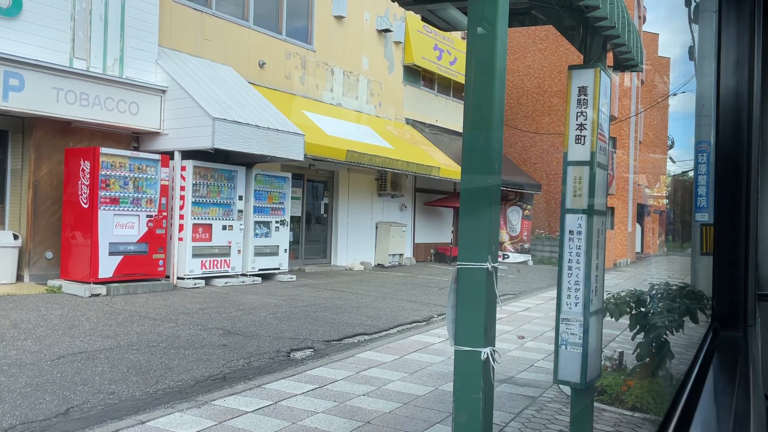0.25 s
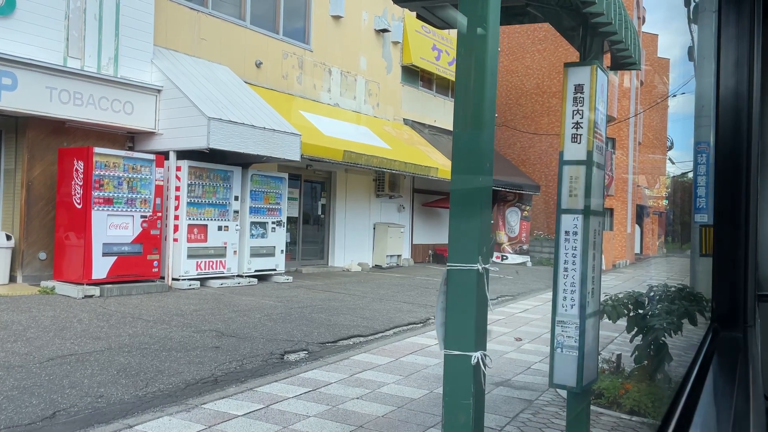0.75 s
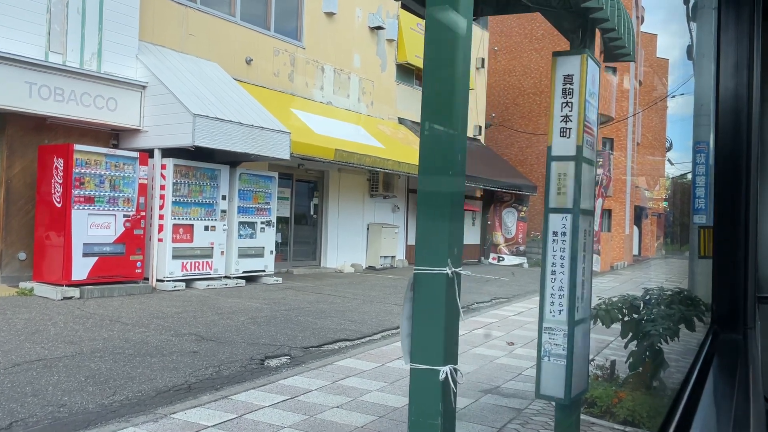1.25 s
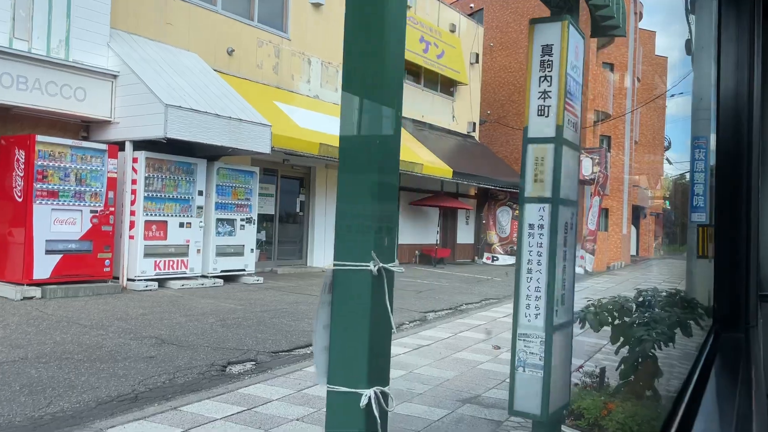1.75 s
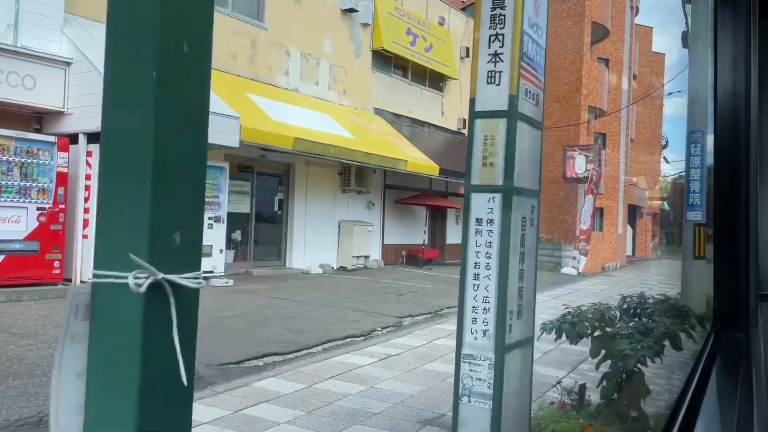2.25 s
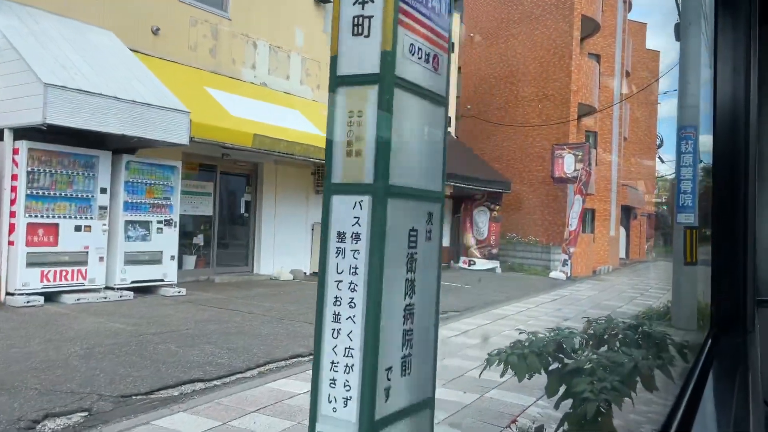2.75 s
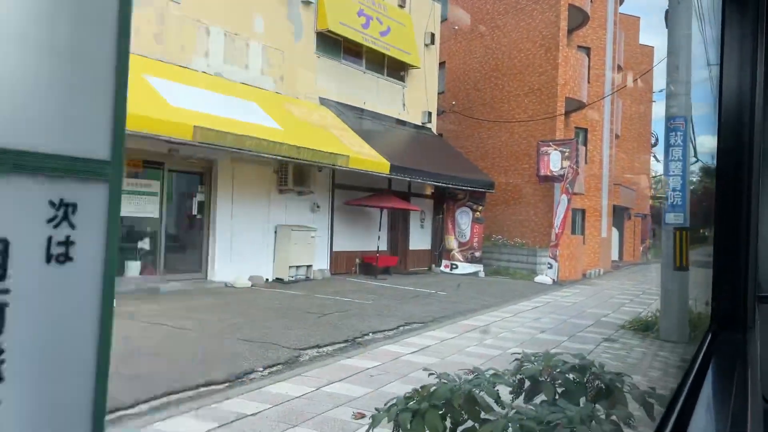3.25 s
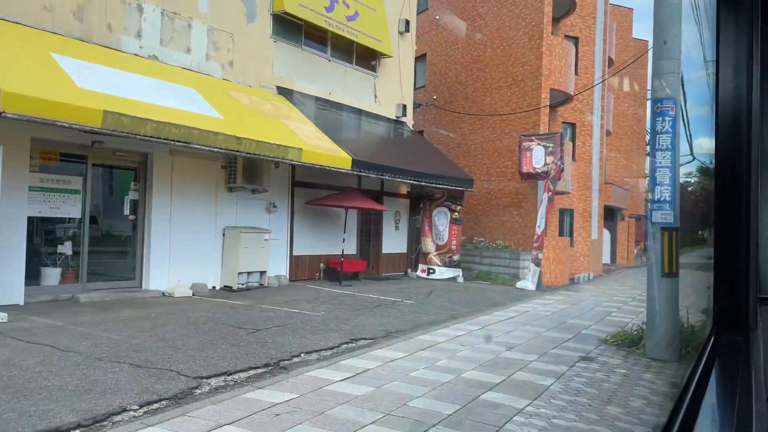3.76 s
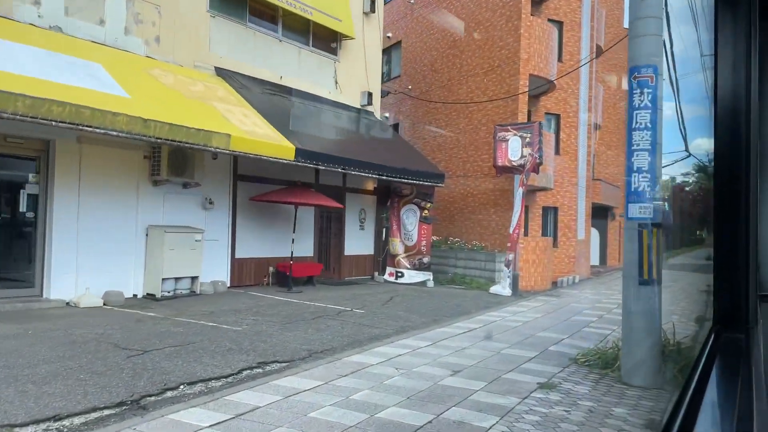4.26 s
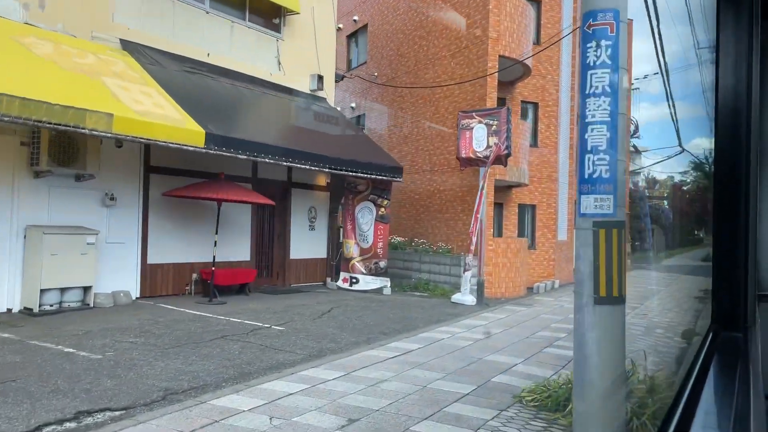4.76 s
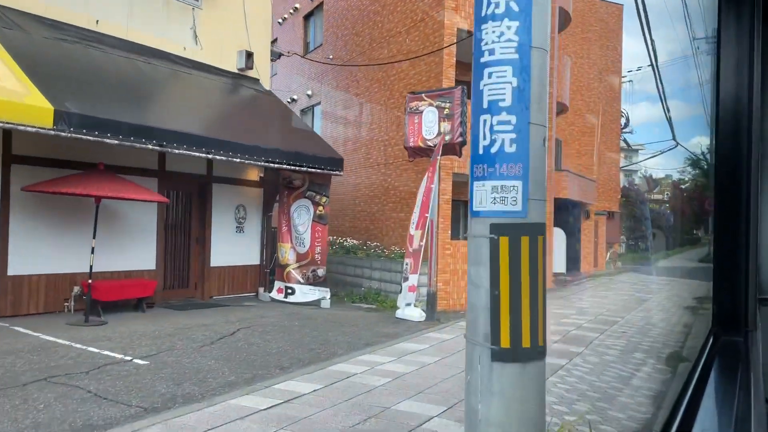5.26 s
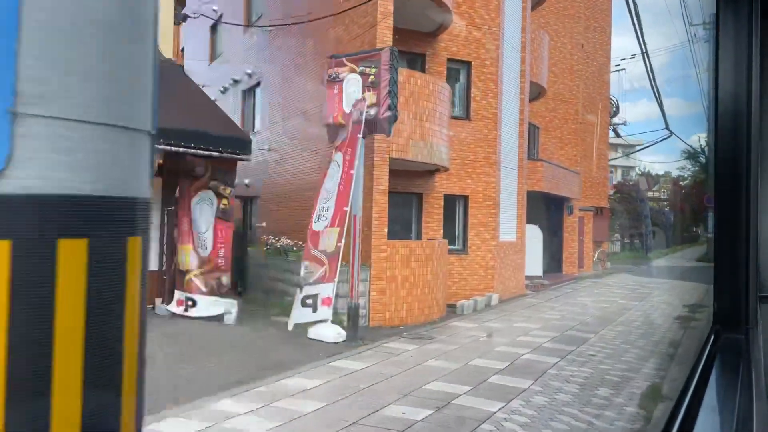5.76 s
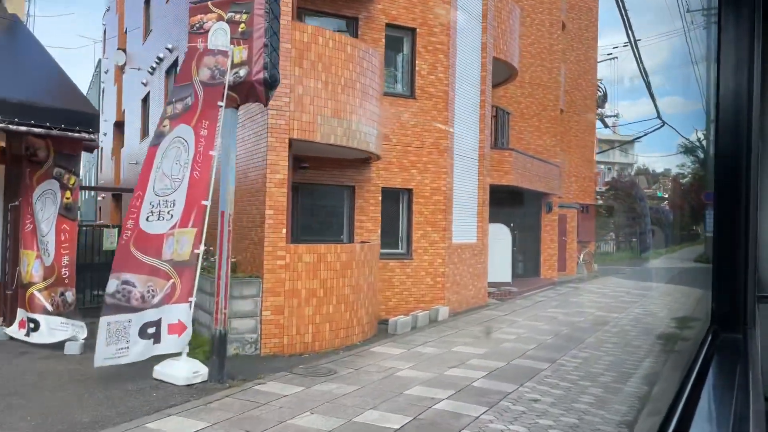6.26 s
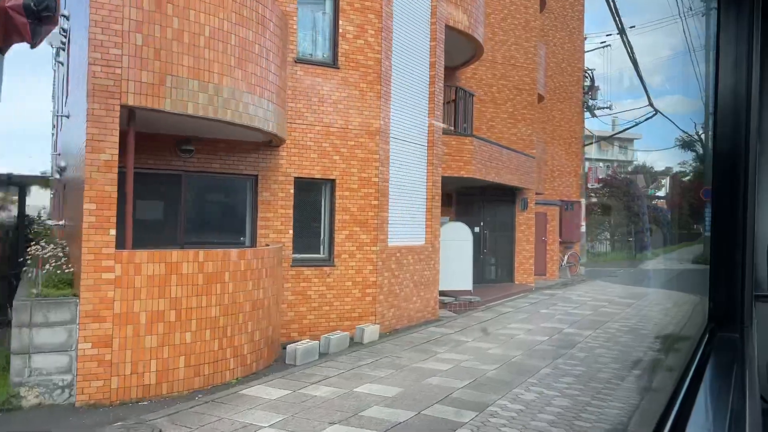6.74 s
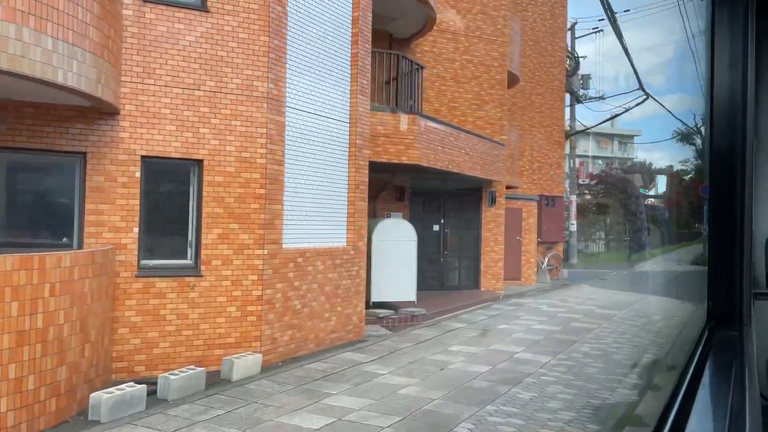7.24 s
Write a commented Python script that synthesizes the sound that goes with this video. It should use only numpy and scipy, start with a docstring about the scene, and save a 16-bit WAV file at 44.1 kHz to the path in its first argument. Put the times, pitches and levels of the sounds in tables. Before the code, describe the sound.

Inside a bus pulling away, the diesel engine sags to a low throb, revs up to a loud drone, then falls at the gear shift.

```python
"""A six-cylinder bus diesel, heard from inside: it sags as the clutch bites, revs up in first gear, drops at the shift.
Sines locked to the engine cycle make its tones; shaped noise makes its boom, roar and knock.
Gears whine and a panel drones as gliding sines; trim ticks and air valves puff as noise through resonances.
Behind them are a squeal, a squeak, a faint steady tone, ventilation noise and a fan motor tone.
A two-port microphone hears it all, bass nearly alike in both ports, treble with gaps in its spectrum."""
import sys
import numpy as np
from scipy import signal
from scipy.fft import rfft, irfft
from scipy.io import wavfile
from scipy.ndimage import uniform_filter1d

SR = 44100
rng = np.random.default_rng(int(sys.argv[2]) if len(sys.argv) > 2 else 0)


def master(y):
    """Save y as 16-bit WAV."""
    cut = np.clip(np.atleast_2d(y).T, -1, 1)
    pcm = np.round(cut * 32767)  # scale
    wavfile.write(sys.argv[1], SR, pcm.astype(np.int16))


N = 330750
T, HZ = np.arange(N) / SR, np.fft.rfftfreq(N, 1 / SR)  # time of each sample (s), frequency of each bin (Hz)
CYLINDERS = 6  # firings in one four-stroke cycle
MID_HZ, MID_LOAD_DB = 70, -25  # firing rate and load that the engine levels refer to

# Course of the engine, levels before the cabin: start_s, firing_hz, load_db (sets roar, knock and uneven tones),
# boom_db, firing_tone_db, one_and_a_half_times_db, twice_db
ENGINE = [(0.0, 47.48, -35.5, -27.5, -33.5, -49.5, -37.5), (0.5, 35.75, -42, -30, -33.5, -32.5, -26.5),
          (0.898, 26.92, -39.5, -28.5, -43, -49, -42.5), (1.202, 20.94, -41, -25, -53, -58, -43),
          (1.498, 23.62, -37.5, -25.5, -44, -49, -37), (1.8, 28.7, -34.5, -25, -40, -30.5, -26),
          (2.1, 35.02, -33, -20.5, -25, -32, -30.5), (2.401, 40.9, -30.5, -25, -32, -39, -36.5),
          (2.649, 45.76, -29.5, -26, -39, -34.5, -26.5), (2.899, 50.12, -28.5, -24, -22.5, -31, -31),
          (3.1, 54.53, -28, -24.5, -19.5, -32.5, -22), (3.301, 59.43, -26.5, -23.5, -23, -24, -32.5),
          (3.5, 62.9, -29.5, -30.5, -33, -29.5, -31), (3.7, 68.5, -28, -24.5, -18, -23, -27.5),
          (3.9, 73.04, -24.5, -29, -34, -27.5, -24.5), (4.102, 76.87, -25.5, -26.5, -18, -18, -27.5),
          (4.301, 80.88, -23, -29.5, -13.5, -23.5, -25.5), (4.502, 85.34, -20.5, -24.5, -28.5, -16, -37.5),
          (4.702, 89.7, -19.5, -20.5, -21.5, -28.5, -36), (4.901, 94.2, -18.5, -24.5, -21, -22, -26.5),
          (5.098, 96.9, -20, -25.5, -19.5, -18.5, -26.5), (5.299, 101.4, -17, -28.5, -19.5, -22.5, -26),
          (5.548, 105.1, -19.5, -22.5, -32.5, -22.5, -25.5),
          (5.699, 104.5, -19.5, -26.5, -26, -20.5, -22.5), (5.9, 100.8, -21.5, -25, -37, -25.5, -24.5),
          (6.103, 98.1, -22.5, -23, -27.5, -18.5, -32), (6.353, 93.55, -24, -23.5, -40, -31, -37.5),
          (6.601, 89.16, -24.5, -29, -30.5, -22, -29.5), (6.8, 83.85, -26.5, -25, -42, -23, -32.5),
          (6.948, 81, -27, -30, -24.5, -21, -30.5), (7.099, 71.47, -26, -28, -25, -24.5, -29.5),
          (7.253, 63.3, -27.5, -27.5, -23.5, -23.5, -32), (7.5, 59.2, -26, -21.5, -29, -31.5, -37)]
# Multiples of the cycle whose levels stand in ENGINE: firing tone, 1.5 times it, twice it
MAIN_TONES = (6, 9, 12)


def engine():
    """Periodic combustion: harmonics of the cycle plus noise whose level follows the load."""
    firing_hz, load_db, boom_db, *main_db = curves(ENGINE)
    cycle = 2 * np.pi * np.cumsum(firing_hz) / SR / CYLINDERS
    load_change_db = load_db - MID_LOAD_DB
    tones = harmonics(cycle, MAIN_TONES, main_db) + steady_tones(cycle, firing_hz)
    tones = tones + uneven_tones(cycle, load_change_db)
    return tones + rumble(boom_db, load_db) + combustion_knock(cycle, load_change_db)


# Steady tones, multiple of the cycle: (level_db at MID_HZ, rise_db per octave of revs, lift_db off the throttle)
ORDERS_OF_CYCLE = {2: (-37.5, 18, -2), 3: (-32.5, 22, 0.5), 4: (-36.5, 20, 0.5), 5: (-26.5, 12, -1.5),
                   7: (-30.5, 2.6, 0.42), 10: (-35.5, 16, 0.56), 11: (-27.5, 5.9, 0.5), 14: (-31.5, 4, 4.4),
                   15: (-28, 1.6, -3), 18: (-34.5, 3.9, 1), 28: (-35.5, 3.7, -1), 30: (-39.5, 7.1, -9.5)}


def steady_tones(cycle, firing_hz):
    """Forced vibration: each order grows with the revs and swells as it sweeps through a frame resonance."""
    lift_s, pedal_s = 5.4, 0.08  # the throttle eases off before the shift; time the move takes
    waver_db, waver_hz = 1, 5.4
    step = 128  # samples between level updates
    t, revs_hz = T[::step], firing_hz[::step]
    lifted = np.clip((t - lift_s) / pedal_s, 0, 1)
    octaves = np.log2(revs_hz / MID_HZ)
    levels_db = []
    for k, (db, rise_db, lift_db) in ORDERS_OF_CYCLE.items():
        level_db = db + rise_db * octaves + lift_db * lifted + frame_db(k * revs_hz / CYLINDERS)
        levels_db.append(np.interp(T, t, level_db))
    waver = waver_db * np.array(wander(waver_hz, count=len(levels_db)))
    return harmonics(cycle, ORDERS_OF_CYCLE, levels_db + waver)


# Resonances of the frame that carries the steady tones: centre_hz, width_hz, gain_db
FRAME = [(34, 7.3, -16), (54.4, 6, -3), (67.4, 3.6, -1), (78.9, 6.6, -1.5), (97, 6.8, -1.5), (118.4, 15, 1),
         (149, 6.5, -0.5), (176.7, 28, -6.5), (212.3, 7.1, 0), (267.5, 40, -4), (311, 15, 1.5),
         (495.6, 27, -0.5)]


def frame_db(hz):
    """Resonant transmission: the powers of the frame's resonances add above a floor."""
    floor_db = -9
    power = amp(2 * floor_db)
    for centre_hz, width_hz, db in FRAME:
        power = power + amp(2 * db) / (1 + (2 * (hz - centre_hz) / width_hz) ** 2) ** 2
    return 10 * np.log10(power)


# Tones between the main and steady ones: multiple of the cycle, level_db within the group
UNEVEN = [(8, -4), (13, -6), (20, -10.5), (21, -11.5), (22, -7.5), (23, -6.5), (24, -6), (25, -8.5),
          (26, -9)]


def uneven_tones(cycle, load_change_db):
    """Broken symmetry: unequal cylinders fill in other multiples of the cycle."""
    level_db, load_share = -31.5, 0.75  # rms at middle load; share of each load change followed
    multiples, order_db = np.transpose(UNEVEN)
    wander_db = 3.0 * np.array(wander(2.6, count=len(UNEVEN)))
    tones = harmonics(cycle, multiples, order_db[:, None] + wander_db)
    return evened(tones) * amp(level_db + load_share * load_change_db)


# Spectrum of the body boom: hz, level_db per Hz (relative)
BOOM = [(8, -13), (18, -14.5), (30, -5.5), (49, -0.5), (75, 8.5), (118, 0.5), (167, -2.5), (260, -6.5),
        (340, -59.5)]
# Spectrum of the low roar: hz, level_db per Hz (relative)
ROAR = [(35, -22), (60, -9.5), (179, -0.5), (295, -7.5), (379, -2), (545, -17), (618, -14.5), (877, -31.5),
        (1200, -24.5), (1560, -78), (2640, -120)]


def rumble(boom_db, load_db):
    """Broadband radiation: boom and roar surge and dip at random."""
    roar_top_db = -25.5  # the roar's load level is capped; at high revs the tones take over
    lumpy_db, lumpy_hz = 2.5, 8
    boom_lumps, roar_lumps = lumpy_db * np.array(wander(lumpy_hz, count=2))
    boom = coloured(noise(), BOOM) * amp(boom_db + boom_lumps)
    roar = coloured(noise(), ROAR) * amp(np.minimum(load_db, roar_top_db) + roar_lumps)
    return boom + roar


# Spectrum of the combustion knock: hz, level_db per Hz (relative)
KNOCK = [(410, -15.5), (540, 2), (650, 0), (757, 0.5), (898, -1.5), (1140, -10), (1500, -10), (1910, -21),
         (2430, -26.5), (4500, -33.5), (5850, -65.5), (9900, -120)]


def combustion_knock(cycle, load_change_db):
    """Amplitude modulation: combustion noise throbs with each firing."""
    level_db, load_share = -41.5, 0.83  # rms at middle load; share of each load change followed
    throb = 1 + 0.18 * np.cos(CYLINDERS * cycle)
    return coloured(noise() * throb, KNOCK) * amp(level_db + load_share * load_change_db)


# First gear whines as it takes up speed: start_s, pitch_hz, level_db
FIRST_GEAR = [(2.25, 184, -48), (2.65, 208, -28), (2.95, 230, -33.5), (3.1, 251, -37.5), (3.3, 272, -29.5),
              (3.55, 290, -31), (3.7, 308, -32.5)]
# Second gear takes up drive: start_s, pitch_hz, level_db
SECOND_GEAR = [(6.72, 338, -37.5), (6.88, 335, -31.5), (7.02, 333.4, -28.5), (7.25, 342, -27),
               (7.5, 352, -24.5)]


def gear_whine():
    """Gear meshing: a sine whose pitch glides with the speed."""
    return tone(FIRST_GEAR) + tone(SECOND_GEAR)


# A panel drones at high revs: start_s, pitch_hz, level_db
DRONE = [(4.78, 563, -43), (5.12, 569, -36.5), (5.3, 568, -40), (5.72, 568, -35), (5.84, 570, -46)]


def panel_drone():
    """Panel resonance: a nearly fixed sine whose level wavers."""
    waver_db = 1.8 * wander(6, count=1)[0]
    return tone(DRONE) * amp(waver_db)


# Trim ticks, levels before the trim resonances: start_s, knock_db (peak), knock_hz, t60_s (the knock takes half),
# rattle_db, treble_db
TICKS = [(1.285, -37, 3323, 0.028, -47, -49), (1.865, -56, 3060, 0.033, -46, -45),
         (2.012, -40, 3260, .015, -54, -70), (2.377, -62, 3216, 0.015, -50, -51),
         (2.411, -49.5, 3225, 0.038, -46, -52), (2.5276, -46, 3300, 0.031, -30.5, -34),
         (2.871, -41.5, 3570, 0.02, -50.5, -73), (3.262, -42, 3199, 0.026, -55, -55),
         (3.827, -33.5, 3322, 0.013, -39.5, -70), (4.7515, -46, 4296, 0.061, -35.5, -50),
         (4.776, -39, 2509, .03, -49.5, -69), (6.089, -35, 3360, 0.017, -44.5, -39)]
# Resonances of the loose trim: centre_hz, width_hz, gain_db
TRIM = [(1100, 770, 10.5), (2460, 400, -6), (3280, 900, 1.5), (4520, 1600, -9), (5900, 700, -5.5)]


def ticks():
    """Impact excitation: a compact decaying knock, then a short crackle in the loose trim."""
    rattle_rise_s, rattle_top_hz = 0.0042, 6500
    knock, rattle, treble = np.zeros((3, N))
    for s, knock_db, hz, t60, rattle_db, treble_db in TICKS:
        after = np.clip(T - s, 0, 1)
        fall = amp(-60 * after / t60) * (T >= s)
        attack = np.minimum(after / 0.00023, 1)
        knock = knock + amp(knock_db) * fall ** 2 * np.sin(2 * np.pi * hz * after) * attack
        # the gain makes up for the fall during the rise
        crackle = fall * np.minimum(after / rattle_rise_s, 1) ** 2 * amp(60 * rattle_rise_s / max(t60, .02))
        rattle = rattle + amp(rattle_db) * crackle
        treble = treble + amp(treble_db) * crackle
    grains = evened(noise() * noise())  # a product of noises is spikier than one noise
    dull = signal.butter(4, rattle_top_hz, fs=SR, output="sos")
    trim = signal.sosfilt(dull, modes(rattle * grains, TRIM))
    return knock + trim + modes(treble * noise(), [(11100, 7200, 0.0032)])


# Air valve puffs: start_s, level_db (before sputter and nozzle gains), rise_s, t60_s,
# treble_db against mids, whistle_db against mids
PUFFS = [(.12, -84, 0.026, .45, 6, -15), (2.40, -82, .015, 0.28, 8, -15),
         (2.535, -76, 0.0032, 0.12, 4, -23), (2.9, -75, 0.0073, 0.086, -4, -14),
         (3.254, -76, 0.01, 0.24, 2, -9), (4.319, -77, 0.016, 0.33, -3, -11),
         (4.455, -73, 0.017, 0.43, -7, -8), (4.73, -70, 0.026, 0.32, -11, -23),
         (4.9, -80, .015, 0.2, 2.5, -19), (5.66, -76, 0.022, 0.43, 4, -8),
         (5.695, -69, 0.019, 0.25, -7, 7.5), (5.885, -75.5, 0.01, 0.28, -3, -3),
         (6.36, -71.5, 0.02, 0.29, 8, 0)]
# Nozzle resonances, a mid and a treble table, each: centre_hz, width_hz, gain_db
NOZZLE = [(2180, 380, 16), (2550, 220, 15), (3820, 1300, 5.5), (5360, 1400, -4.5)], [(10100, 500, -5.5),
          (10400, 4300, 3)]
# The nozzle's own notes: centre_hz, width_hz, gain_db
WHISTLE = [(5150, 370, 7.5), (9950, 400, 5)]


def puffs():
    """Turbulent jet: escaping air swells softly, falls more slowly and sputters through a resonant nozzle."""
    mids, treble, whistle = np.zeros((3, N))
    for s, db, rise, t60, treble_db, whistle_db in PUFFS:
        after = np.clip(T - s, 0, 2)
        swell = (1 - np.exp(-after / np.clip(rise, .001, .04))) ** 2
        shape = amp(db - 60 * after / min(t60, .5)) * swell
        mids = mids + shape
        treble = treble + shape * amp(treble_db)
        whistle = whistle + shape * amp(whistle_db)
    flutter = evened(uniform_filter1d(rng.standard_normal(N), size=60))
    sputter = amp(24.5 + 2.1 * flutter)  # overall gain and its random swing, dB
    nozzle_mids, nozzle_treble = NOZZLE
    bands = [(mids, nozzle_mids), (treble, nozzle_treble), (whistle, WHISTLE)]
    return sum(modes(part * sputter * noise(), table) for part, table in bands)


# A short squeal with the last puff: start_s, pitch_hz, level_db
SQUEAL = [(6.3, 2300, -58.5), (6.39, 2380, -55.5), (6.46, 2370, -61)]


def rough_squeal():
    """Narrow-band noise: random swells roughen a gliding sine."""
    return fuzzy(tone(SQUEAL), width_hz=60)


# A thin high squeak: start_s, pitch_hz, level_db
SQUEAK = [(1.38, 9480, -82), (1.5, 9450, -76), (1.7, 9360, -77), (1.78, 9350, -84)]


def high_squeak():
    """Narrow-band noise: faster random swells blur a high, slightly falling sine."""
    return fuzzy(tone(SQUEAK), width_hz=160)


# A faint tone of nearly steady pitch: start_s, pitch_hz, level_db
BUZZ = [(4.4, 1136, -54), (5.65, 1136, -49), (5.95, 1134, -57), (7.0, 1136, -53), (7.35, 1138, -47),
        (7.5, 1136, -52)]


def faint_tone():
    """Narrow-band noise: slow random swells make a sine swell and fade."""
    return fuzzy(tone(BUZZ), width_hz=4)


# Spectrum of the fan rush: hz, level_db per Hz (relative); then its rms before the cabin (dB)
VENT, VENT_DB = [(88, -34.5), (150, 5), (256, -8.5), (335, -2), (460, -20), (620, -16.5), (934, -18),
                 (1430, -23.5), (2000, -30.5), (2800, -39.5), (3300, -37.5), (4400, -42.5), (5500, -47),
                 (6500, -47.5), (8000, -73)], -35
# Spectrum of the vent hiss: hz, level_db per Hz (relative); then its rms before the cabin (dB)
HISS, HISS_DB = [(4000, -25.5), (6000, 3.5), (7500, 6.5), (10000, -8.5), (12500, -11.5), (15500, -7)], -62


def ventilation():
    """Stationary flow noise: steady fan rush and hiss."""
    return amp(VENT_DB) * coloured(noise(), VENT) + amp(HISS_DB) * coloured(noise(), HISS)


# Fan motor tone, levels before the port gains: start_s, pitch_hz, level_db
HUM = [(0, 958, -55), (1.3, 965, -54), (1.7, 968, -61), (5.05, 970, -63), (5.3, 964, -50), (6.05, 953, -52),
       (6.25, 948, -59), (6.75, 946, -54), (7.5, 948, -57)]


def fan_hum():
    """Phase opposition: the fan tone reaches the two ports with opposite sign and unequal level."""
    left, right = amp(9), -amp(-5)
    return tone(HUM) * np.array([[left], [right]])


# Panel resonances of the cabin: centre_hz, width_hz, gain_db
PANELS = [(163, 14, 6.5), (353, 28, 2.5), (389, 31, 4), (487, 30, 6.5), (752, 11, 6.5), (975, 110, 1.5),
          (1131, 66, 4.5), (1261, 38, 6.5), (1483, 14, 8), (2622, 530, 7.5), (5190, 390, 8.5),
          (11850, 80, 6), (12200, 120, 3)]


def cabin(x):
    """Resonant amplification: the panels lift narrow bands."""
    lift_db = sum(db / (1 + (2 * (HZ - hz) / width) ** 2) for hz, width, db in PANELS)
    return irfft(rfft(x) * amp(lift_db), N)


# Response of the sum of the ports: hz, gain_db
SUM = [(5800, 0), (6500, -5), (6950, -50), (8250, -50), (8800, -8), (9500, -4), (12700, -6), (13700, -45)]
# Response of their difference: hz, gain_db
DIFFERENCE = [(40, -17), (170, -15), (250, -14), (350, -5), (480, 4), (650, 1.5), (1300, -1.5),
              (2700, -4.5), (3700, -1.5), (5000, -5), (6800, -1), (9200, -6.5), (10000, -30), (12200, -33),
              (12800, -8), (15500, -6)]
# Likeness of difference and sum: hz, in_step (-1 to 1), in_quadrature (-1 to 1)
LINK = [(70, 0.015, 0.6), (170, 0.34, 0.23), (250, 0.4, -0.046), (350, 0.61, 0.94), (480, 0.8, 0.66),
        (650, 0.46, 0.67), (900, 0.42, 0.14), (1300, 0.44, -0.35), (1900, -0.12, -0.33), (2700, 0.11, 0.34),
        (4000, 0.32, 0.22), (5500, 0.36, 0.05), (9000, 0.03, 0.4), (12000, 0.02, -0.23)]


def ports(shared, scattered):
    """Partial coherence: sum and difference of the two ports, partly linked, to left and right."""
    link = read(LINK, HZ) + 1j * read(LINK, HZ, column=2)
    link = link / np.maximum(abs(link), 1)
    a, b = rfft(shared), rfft(scattered)
    unlinked = 1j * np.sqrt(1 - abs(link) ** 2 + 1e-9)
    mid = irfft(a * amp(read(SUM, HZ)), N)
    side = irfft((link * a + unlinked * b) * amp(read(DIFFERENCE, HZ)), N)
    return np.array([mid + side, mid - side])


def harmonics(cycle, multiples, levels_db):
    """Harmonic synthesis: sines phase-locked to the engine cycle, levels as rms."""
    total = 0
    for k, db in zip(multiples, levels_db):
        total = total + np.sqrt(2) * amp(db) * np.sin(k * cycle + 2 * np.pi * rng.random())
    return total


def tone(rows):
    """Frequency modulation: a sine along its pitch curve, fading at both ends, level as rms."""
    hz, db = curves(rows)
    to_nearest_end = np.minimum(T - rows[0][0], rows[-1][0] - T)
    fade = np.clip(to_nearest_end / 0.0048 + .01, 0, 1)
    return np.sqrt(2) * amp(db) * fade * np.sin(2 * np.pi * np.cumsum(hz) / SR)


def fuzzy(x, width_hz):
    """Random modulation: low-passed noise smears a tone into a narrow band."""
    pole = np.exp(-np.pi * width_hz / SR)
    return x * evened(signal.lfilter([1], [1, -pole], rng.standard_normal(N)))


def modes(x, table):
    """Modal superposition: a sum of causal resonances."""
    return sum(amp(db) * signal.lfilter(*signal.iirpeak(hz, hz / width, SR), x, axis=-1)
               for hz, width, db in table)


def coloured(x, points):
    """Spectral shaping: gives x a spectrum, then rms 1."""
    return evened(irfft(rfft(x) * amp(read(points, HZ)), N))


def noise():
    """Incoherence: two unrelated noises, what both ports share and what is scattered in the cabin."""
    return rng.standard_normal((2, N))


def wander(rate_hz, count):
    """Random-phase superposition: slow curves of about rms 1 from sines up to rate_hz."""
    f = np.geomspace(rate_hz / 8, rate_hz, 10)
    t = T[::256]
    phases = rng.random((count, 10, 1))
    slow = np.sin(2 * np.pi * (f[:, None] * t + phases)).sum(1) / np.sqrt(5)
    return [np.interp(T, t, row) for row in slow]


def curves(rows):
    """Linear interpolation: the columns of a table, one value per sample."""
    s, *columns = np.transpose(rows)
    return [np.interp(T, s, c) for c in columns]


def read(points, hz, column=1):
    """Logarithmic interpolation: a spectrum table as straight lines on log frequency."""
    p = np.array(points)
    return np.interp(np.log(hz + 1), np.log(p[:, 0] + 1), p[:, column])


def evened(x):
    """Normalisation to rms 1."""
    return x / np.sqrt(np.mean(x ** 2) + 1e-20)


def amp(db):
    """Decibel law: level to amplitude."""
    return 10 ** (np.asarray(db) / 20)


def scene():
    """Linear superposition: all sources add, then reach the two ports."""
    soft = np.clip(np.minimum(T, T[-1] - T) / .006, 0, 1)  # engine and ventilation start and end softly
    air = cabin(soft * (engine() + ventilation()))
    air = air + gear_whine() + panel_drone() + ticks() + puffs()
    air = air + rough_squeal() + high_squeak() + faint_tone()
    return ports(*air) + fan_hum()


def record(dry):
    """Band limitation: the microphone's bass roll-off, then a steep treble limit."""
    edge_hz = 15800
    x = signal.sosfilt(signal.butter(2, 15, "high", fs=SR, output="sos"), dry)
    return signal.oaconvolve(x, signal.firwin(511, edge_hz, window=("kaiser", 9), fs=SR)[None], "same")


dry = scene()
out = record(dry)
master(out)
```